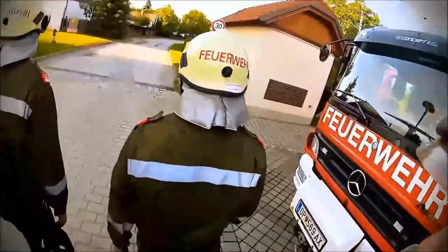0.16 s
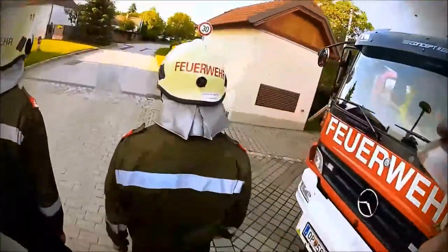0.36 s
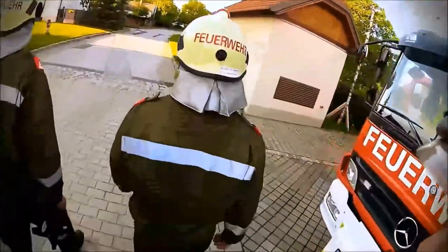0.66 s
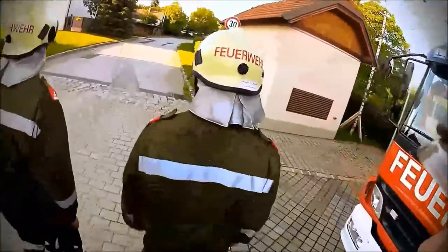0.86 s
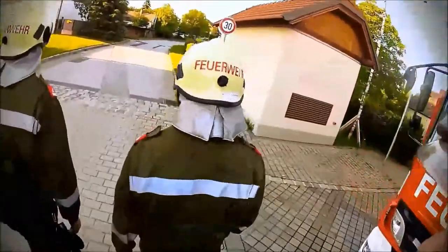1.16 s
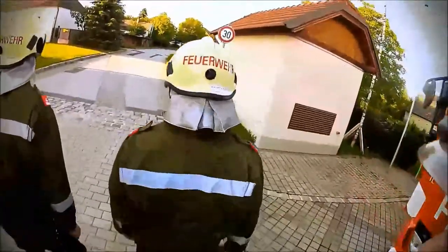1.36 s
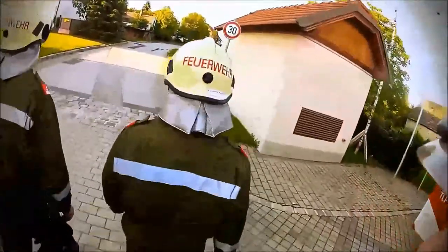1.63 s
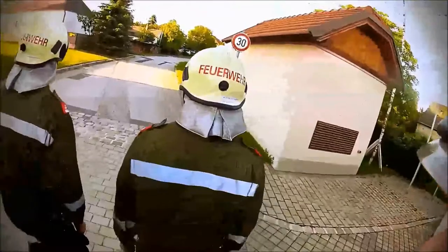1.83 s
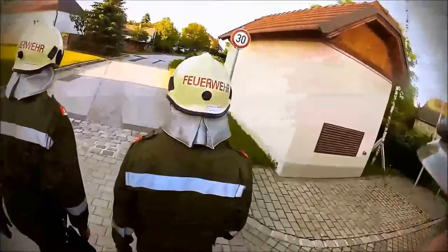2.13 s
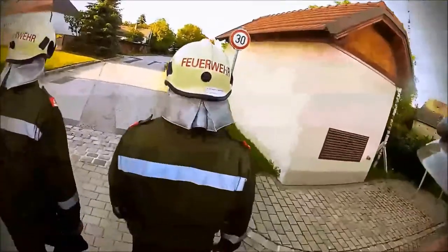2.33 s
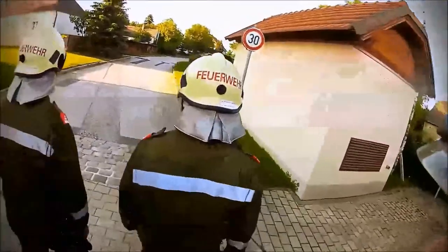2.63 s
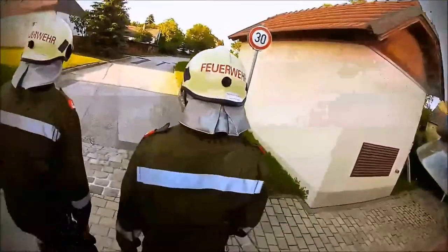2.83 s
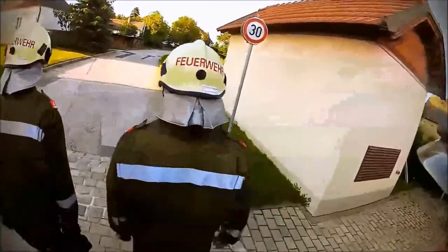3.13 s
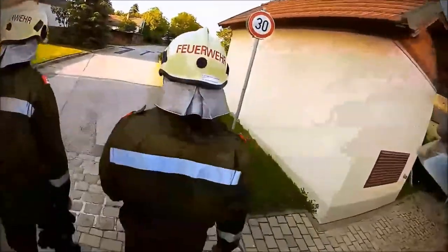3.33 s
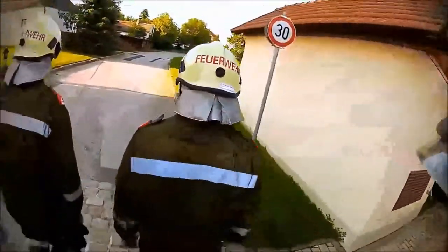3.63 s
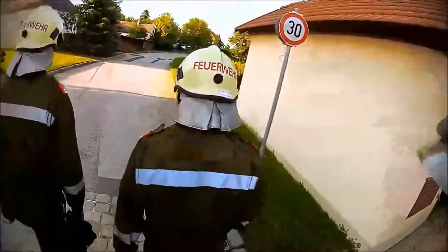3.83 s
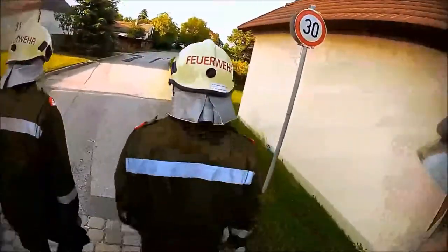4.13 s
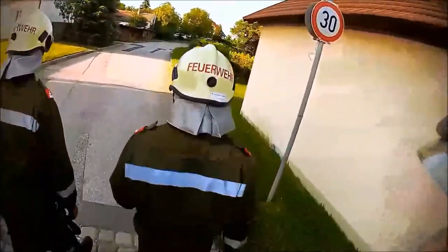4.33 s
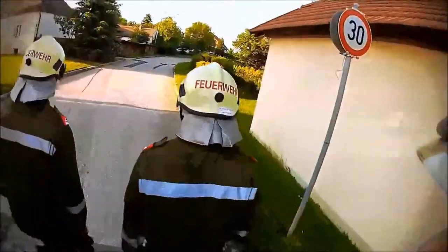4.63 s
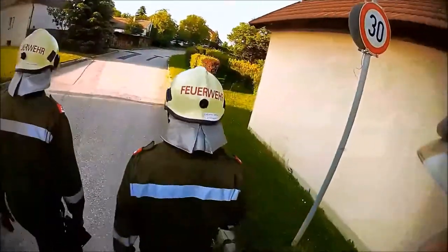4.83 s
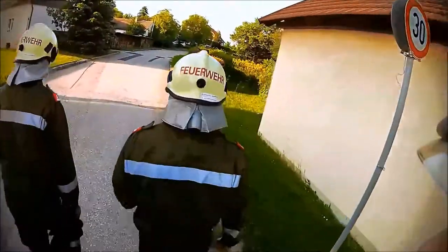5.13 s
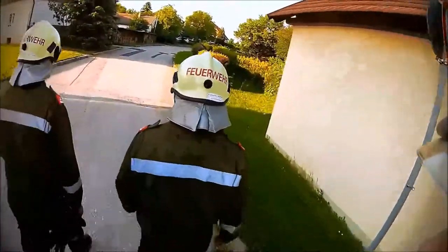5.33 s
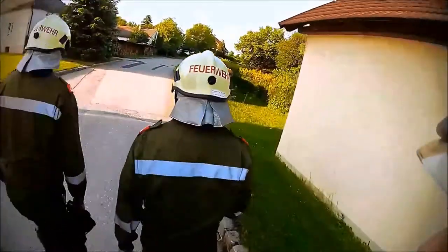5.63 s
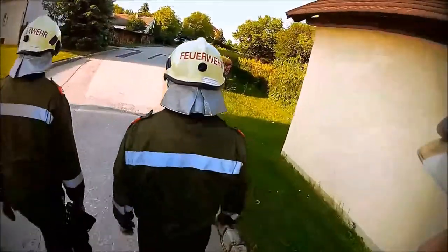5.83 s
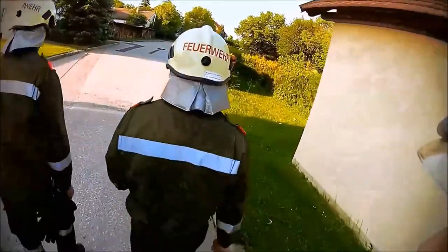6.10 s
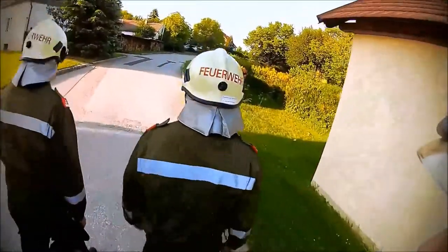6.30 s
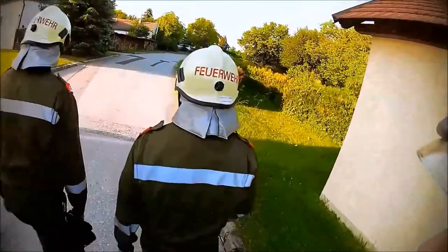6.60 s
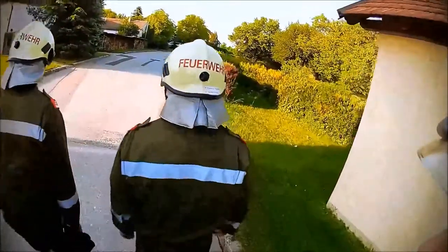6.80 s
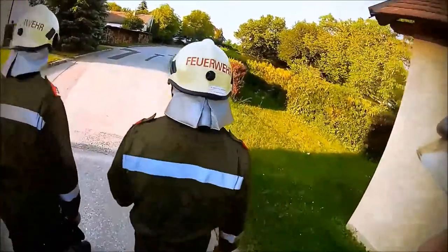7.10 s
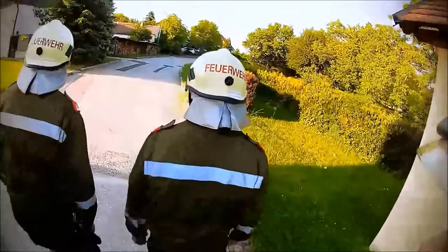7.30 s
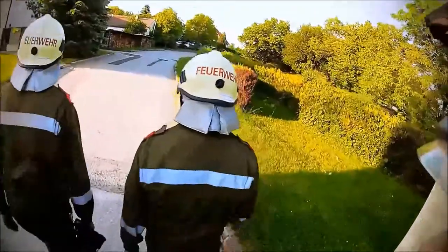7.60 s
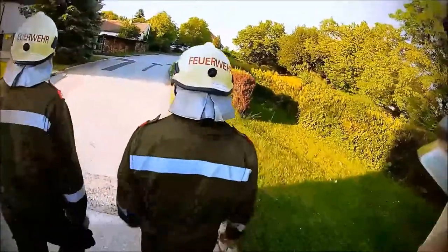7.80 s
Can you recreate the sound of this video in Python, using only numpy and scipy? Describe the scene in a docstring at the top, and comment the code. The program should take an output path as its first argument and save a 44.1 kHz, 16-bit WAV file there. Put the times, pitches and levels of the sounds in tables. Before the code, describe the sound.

Steady marching steps, slightly more than two a second, heard from a microphone strapped to one marcher. Low thuds dominate, varying in force, the second very soft. Short knocks of the loose casing accompany many of them, with lighter ticks on some rebounds. Behind are faint grinding soles, grit taps, rustling jackets, a slight wall reflection and constant thin hiss, with coarse treble.

```python
"""Marching firefighters heard from a body-worn camera

Firefighters march in step over paving and asphalt, one of them wearing a camera.
Each footfall jolts the camera through the body: pulses ring its mount as a low thud.
On many steps and some rebounds the housing clacks, as a burst of decaying modes.
Boots and jackets, shaped noise, are heard faintly through the closed shell, over steady hiss and rumble.
A sample-and-hold recorder mirrors it all into the treble."""
import sys
import numpy as np
from scipy import signal
from scipy.fft import rfft, irfft, next_fast_len
from scipy.io import wavfile
from scipy.ndimage import map_coordinates

SR = 44100
rng = np.random.default_rng(int(sys.argv[2]) if len(sys.argv) > 2 else 0)


def pcm_store(signal):
    """Save signal as 16-bit PCM."""
    levels = np.round(np.clip(np.atleast_2d(signal), -1, 1) * 32767)
    wavfile.write(sys.argv[1], SR, levels.astype(np.int16).T)


N = 350681  # length in samples


def amp(db):
    """Decibels to gain."""
    return 10 ** (np.asarray(db) / 20)


def unit(x):
    """Scale to rms 1."""
    return x / np.sqrt(np.mean(x ** 2) + 1e-20)


def along(points, hz):
    """Read (Hz, value) points on a log frequency axis."""
    point_hz, values = np.transpose(points)
    return np.interp(np.log(hz + 1), np.log(point_hz + 1), values)


def filtered(x, response):
    """Filter x by a complex response of frequency."""
    size = next_fast_len(N + SR)
    spectrum = rfft(x, size) * response(np.fft.rfftfreq(size, 1 / SR))
    return irfft(spectrum, size)[:N]


def noise(spectrum):
    """Coloured noise of rms 1."""
    white = rng.standard_normal(N)
    return unit(filtered(white, lambda hz: amp(along(spectrum, hz))))


def wobble(rate):
    """A smooth random curve, rate knots a second."""
    knots = rng.standard_normal(int(N * rate / SR) + 4)
    return map_coordinates(knots, [np.arange(N) * rate / SR])


def add(track, s, sound):
    """Mix a sound into a track from time s on."""
    start = max(round(s * SR), 0)
    part = track[start:start + len(sound)]
    part += sound[:len(part)]


def resonances(modes, f):
    """Summed response of (Hz, width Hz, gain) resonators."""
    return sum(gain * 1j * f * width / (hz * hz - f * f + 1j * f * width) for hz, width, gain in modes)


# Colour of hiss and outdoor rumble. Each row: frequency in Hz, relative density in dB per Hz.
AIR_SPECTRUM = [(12, -38), (20, -4), (49, -5), (86, -8.5), (197, -10.5), (399, -17), (737, -26), (890, -26),
                (1360, -30), (1810, -29.5), (1980, -30.5), (4980, -34.5), (5600, -35), (7280, -23),
                (12300, -120)]
# Sway and bounce of the camera mount. Each row: frequency in Hz, width in Hz, relative gain (linear).
MOUNT_MODES = [(27.2, 7.4, 7.8), (68, 44, 3), (118, 16, .7), (212, 22, 1.3), (378, 20, 1)]


def air(level_db=-59.5, sway_db=-61):
    """Steady hiss and outdoor rumble, over noise through the lowest mount mode: the carried camera's sway."""
    white = rng.standard_normal(N)
    sway = unit(filtered(white, lambda f: resonances(MOUNT_MODES[:1], f) ** 2))
    return amp(level_db) * noise(AIR_SPECTRUM) + amp(sway_db) * sway


# Colour of rubbing cloth and soles. Each row: frequency in Hz, relative density in dB per Hz.
RUB_SPECTRUM = [(100, 7), (400, -1.5), (800, -4), (1400, -10.5), (2300, -0.5), (4000, 0), (5300, -0.5),
                (6000, 3.5)]


def jackets(level_db=-71, sway_db=3):
    """Heavy cloth keeps up a faint, slowly swaying rustle."""
    return amp(level_db + sway_db * wobble(7.1)) * noise(RUB_SPECTRUM)


# The wearer's footfalls. Each row: main blow in seconds, relative level in dB, duration ratio.
STEPS = [(0.272, -25, 1.01), (0.715, -51, 0.88), (1.146, -26.5, 1), (1.649, -31, 1.09), (2.104, -30, 1.04),
         (2.561, -29, 1.03), (3.008, -27, 1.01), (3.46, -27.5, 1.01), (3.917, -26.5, 0.99),
         (4.362, -31, 1.07), (4.832, -24, 1), (5.292, -27.5, 0.92), (5.748, -24.5, 1.03),
         (6.181, -26, 0.98), (6.64, -29, 1), (7.106, -30, 1.01), (7.576, -31.5, 1.11)]
# The soles start to roll ROLL_LEAD_S before the main blow, then rise, hold and release (s).
ROLL_LEAD_S, ROLL_RISE_S, ROLL_HOLD_S, ROLL_RELEASE_S = 0.067, 0.066, 0.041, 0.055


def rolls(level_db=-55, vary_db=0.5, uneven_db=3.5, grit_db=3):
    """At every step the soles grind from heel to toe, about equally whether the step is hard or light."""
    pressure, t = np.zeros(N), np.arange(SR // 3) / SR
    corners = np.cumsum([0, ROLL_RISE_S, ROLL_HOLD_S, ROLL_RELEASE_S])
    shape = np.interp(t, corners, [0, 1, 1, 0])
    for (s, _, _), size in zip(STEPS, rng.standard_normal(len(STEPS))):
        add(pressure, s - ROLL_LEAD_S, amp(level_db + vary_db * size) * shape)
    roughness_db = uneven_db * wobble(50) + grit_db * wobble(400)
    return pressure * unit(noise(RUB_SPECTRUM) * amp(roughness_db))


# The sharpest taps of soles and grit. Each row: start in seconds, relative level in dB.
TAPS = [(0.222, -65), (0.716, -63), (2.145, -66.5), (2.602, -61.5), (2.95, -65.5), (4.037, -60.5),
        (5.347, -64), (6.147, -66), (6.191, -64)]
# Colour of grit. Each row: frequency in Hz, relative density in dB per Hz.
GRIT_SPECTRUM = [(100, 19.5), (400, -8), (800, 3.5), (1500, 4.5), (2300, 6), (4000, -5.5), (6000, -1.5)]


def taps(level_db=14, t60=0.036, faint_db=-70, vary_db=1.5, lead_s=.02, spread_s=.05, fade_db=2.0, count=5):
    """A toe or bit of grit meets stone: a sudden, quickly dying burst. Faint ones scatter around every step."""
    burst, t = np.zeros(N), np.arange(SR // 10) / SR
    faint = []
    for s, _, _ in STEPS:
        for late, size in zip(rng.exponential(size=count), rng.standard_normal(count)):
            # later ones are weaker
            faint.append((s - lead_s + spread_s * late, faint_db + vary_db * size - fade_db * late))
    for s, db in list(TAPS) + faint:
        add(burst, s, amp(db + level_db - 60 * t / t60))
    return burst * noise(GRIT_SPECTRUM)


# Soles that drag and stand out. Each row: centre in seconds, relative level in dB,
# half length (Gaussian sigma) in seconds, hiss relative to the dull part in dB.
SCUFFS = [(0.256, -56, 0.0065, 5), (0.628, -63, 0.0091, -10), (0.764, -59, 0.012, 10),
          (0.804, -58, 0.008, -20), (1.208, -60, 0.0085, 6.5), (1.579, -66.5, 0.016, -5),
          (2.982, -63, 0.029, -3), (3.089, -63.5, 0.018, 0.5), (3.879, -61, 0.011, 4),
          (4.012, -59.5, 0.0086, -1), (4.385, -53.5, 0.0064, -6), (4.796, -55.5, 0.007, -9),
          (4.831, -57.5, 0.015, 3), (5.236, -66.5, 0.02, -2), (5.321, -65, 0.013, 1.5),
          (5.929, -65, 0.018, -7), (6.688, -62.5, 0.0061, 6), (6.77, -59.5, 0.015, 5)]


def scuffs(level_db=14, grit_db=4.0, hiss_hz=4000):
    """A dragged sole makes a short stroke of gritty friction; some hiss more sharply than others."""
    stroke, hiss = np.zeros((2, N))
    for s, db, half, hiss_db in SCUFFS:
        t = np.arange(round(6 * half * SR)) / SR - 3 * half
        swell = amp(db + level_db) * np.exp(-.5 * (t / half) ** 2)
        add(stroke, s + t[0], swell)
        add(hiss, s + t[0], swell * amp(hiss_db))
    grit = unit(noise(RUB_SPECTRUM) * amp(grit_db * wobble(400)))
    dull = filtered(grit, lambda hz: 1 / (1 + (hz / hiss_hz) ** 6))
    return stroke * dull + hiss * (grit - dull)


# Colour of soles slapping the ground. Each row: frequency in Hz, relative density in dB per Hz.
SLAP_SPECTRUM = [(60, 4), (200, 24), (400, 3.5), (700, 3.5), (1500, 3.5), (2300, -8), (4000, -30),
                 (6000, -13)]


def boots(level_db=-53, lead_s=.028, spread_s=.035, t60=0.12, crunch_db=4, follow=1.0, count=10):
    """The group's soles slap the ground nearly together, harder when the wearer stamps."""
    power, t = np.zeros(N), np.arange(SR // 5) / SR
    usual_db = np.median(np.array(STEPS)[:, 1])
    for s, db, _ in STEPS:
        force_db = level_db + follow * (db - usual_db)
        for late, size in zip(rng.exponential(size=count), rng.standard_normal(count)):
            slap = amp(force_db + 2 * size - 2 * late - 60 * t / t60)
            add(power, s - lead_s + spread_s * late, slap ** 2)
    return np.sqrt(power) * unit(noise(SLAP_SPECTRUM) * amp(crunch_db * wobble(300)))


# Decay of the house front's answer. Each row: frequency in Hz, t60 in seconds.
WALL_DECAY = [(200, 0.74), (2000, 1), (10000, 0.16)]


def wall(x):
    """A short diffuse answer from the house front: decaying noise, delayed by 12.5 ms."""
    hz, t, z = signal.stft(rng.standard_normal(SR // 2), SR, nperseg=256)
    decay = amp(-60 * t / along(WALL_DECAY, hz)[:, None])
    tail = signal.istft(z * decay, SR, nperseg=256)[1]
    delayed = np.pad(x, (SR // 80, 0))
    return signal.fftconvolve(delayed, tail / np.linalg.norm(tail))[:N]


# Resonances that let outside sound in. Each row: frequency in Hz, width in Hz, gain in dB.
SHELL_MODES = [(385.4, 68, 10), (682, 266, 4.5), (850, 130, -9.5), (1064, 100, -2), (1470, 170, 0),
               (2160, 288, 5), (3190, 350, -1.5), (3823, 52, 2), (4800, 1100, -14)]


def through_shell(outside):
    """The closed housing passes airborne sound mainly at its resonances."""
    modes = [(hz, width, amp(db)) for hz, width, db in SHELL_MODES]
    return filtered(outside, lambda f: resonances(modes, f))


def ring(modes, t, spread_db, detune):
    """One decaying sine a mode, a little different in strength and pitch at every blow."""
    hz, db, t60 = np.transpose(modes)[:, :, None]
    size, shift = rng.standard_normal((2, *hz.shape))
    envelope = amp(db + spread_db * size - 60 * t / t60)
    return envelope * np.sin(2 * np.pi * hz * (1 + detune * shift) * t)


# The housing hits its stop, at a hard heel strike or lightly on the rebound.
# Each row: contact in seconds, relative level in dB.
CLACKS = [(0.249, -37), (1.123, -37), (2.083, -39), (2.986, -38), (3.177, -47.5), (3.441, -40.5),
          (3.896, -39.5), (4.809, -36), (5.01, -47.5), (5.272, -40), (5.723, -39), (5.907, -47.5),
          (6.622, -40.5), (6.812, -46.5), (7.555, -39)]
# Modes of the housing. Each row: nominal frequency in Hz, relative level in dB, t60 in seconds.
HOUSING_MODES = [(210, -8, .04), (375.3, -2, 0.18), (782, 5.5, 0.058), (876, 3.5, 0.037),
                 (1087, 11.5, 0.0091), (1440, -9, 0.0061), (1540, -2, 0.01), (1853, 12, 0.022),
                 (2250, 7.5, 0.017), (2560, 0.5, 0.0066), (2860, 0.5, 0.018), (3470, -2, 0.0097),
                 (4860, -29, 0.0037)]
# A clack below FULL_CLACK_DB loses treble: dB per octave for each dB it is weaker.
FULL_CLACK_DB, CLACK_DULLING = -38, 1.74


def clacks(level_db=-6, bounce_s=0.00448, bounce_db=-7, soft_hz=1100, attack_s=0.0001,
           slide_db=-17, slide_s=0.0081):
    """The housing slides into its stop and the contact wakes its modes; a duller bounce follows at once."""
    track, slide = np.zeros((2, N))
    t = np.arange(SR // 12) / SR
    hz = np.array(HOUSING_MODES)[:, :1]
    sign = (-1) ** np.arange(len(hz))[:, None]  # neighbouring modes start in opposite directions
    octaves = np.clip(np.log2(hz / 900), 0, 1.3)
    for s, db in CLACKS:
        bright_db = CLACK_DULLING * min(db - FULL_CLACK_DB, 0)
        modes = sign * ring(HOUSING_MODES, t, spread_db=2.0, detune=0.02) * amp(bright_db * octaves)
        crack = amp(bright_db - 14 - 60 * t / 0.038) * rng.standard_normal(len(t))
        contact = (modes.sum(0) + crack) * (1 - np.exp(-t / attack_s))
        bounce = (modes / (1 + (hz / soft_hz) ** 4)).sum(0)
        add(track, s, amp(db + level_db) * contact)
        add(track, s + bounce_s, amp(db + level_db + bounce_db) * bounce)
        # the slide swells up to the moment of contact
        add(slide, s - t[-1], amp(db + slide_db) * np.exp(-t[::-1] / slide_s))
    return track + slide * noise(GRIT_SPECTRUM)


# Jolts within a footfall, from heel strike to settling.
# Each row: nominal delay from the main blow in seconds, signed relative push, nominal contact time in seconds.
JOLTS = [(-.022, .58, .0037), (-.008, .35, .007), (0, -.95, .0035), (.021, .24, .006), (.054, .09, .008)]
# A lighter step lands more softly: contact time ratio at FIRM_DB, its growth in dB per dB of lost force.
FIRM_DB, FIRM_SOFTNESS, SOFTENING = -25, 0.93, 0.29


def thuds(vary=0.16, scatter=0.032, heel_ratio=0.85):
    """Each jolt is a smooth push with recoil, longer on a light step; the mount rings on after it."""
    track = np.zeros(N)
    lead = .1  # seconds of room before the main blow
    t = np.arange(SR // 3) / SR - lead
    for s, db, duration in STEPS:
        softness = FIRM_SOFTNESS * amp(SOFTENING * (FIRM_DB - db))
        draws = rng.standard_normal((len(JOLTS), 2))
        for k, ((delay, push, contact), (late, size)) in enumerate(zip(JOLTS, draws)):
            width = contact * softness * (heel_ratio if k == 0 else 1)
            # only jolts after the main blow scatter in time
            moment = delay * duration + max(delay, 0) * scatter * late
            u = (t - moment) / width
            pulse = (1 - 3 * u ** 2) / (1 + u ** 2) ** 3
            add(track, s - lead, amp(db) * push * (1 + vary * size) * pulse)
    return filtered(track, lambda f: 1 + resonances(MOUNT_MODES, f))


# Colour of shaking jacket and straps. Each row: frequency in Hz, relative density in dB per Hz.
STRAPS_SPECTRUM = [(20, -18), (60, 9.5), (130, 1.5), (250, -7), (340, -23), (500, -43), (1200, -70)]


def shudder(level_db=-17, rise_s=0.017, t60=0.55):
    """Jacket and straps shake loosely after each footfall, giving the thud a ragged tail."""
    shake, t = np.zeros(N), np.arange(SR // 2) / SR
    heel_s = JOLTS[0][0]
    for s, db, _ in STEPS:
        add(shake, s + heel_s, amp(db + level_db - 60 * t / t60) * (1 - np.exp(-t / rise_s)))
    return shake * noise(STRAPS_SPECTRUM)


def scene():
    """Body-borne thuds and clacks, with the airborne steps around them."""
    outside = jackets() + rolls() + taps() + scuffs() + boots()
    outside = outside + amp(-15.5) * wall(outside)
    return (air() + through_shell(outside) + clacks() + thuds() + shudder())[None]


EDGE_HZ = 5646  # the recorder's input filter
HOLD_HZ = 12000  # its sampling rate
TOP_HZ = 15650  # nothing passes above this


def record(dry):
    """Band-limited sampling at a low rate; holding each sample mirrors the sound around that rate."""
    band = filtered(dry[0], lambda hz: 1 / (1 + (hz / EDGE_HZ) ** 36) * (hz < HOLD_HZ / 2))
    # the cosine makes the mirror images, the sinc is the response of the hold
    sampled = band * (1 + 2 * np.cos(2 * np.pi * HOLD_HZ * np.arange(N) / SR))
    return filtered(sampled, lambda hz: np.sinc(hz / HOLD_HZ) * (hz < TOP_HZ))[None]


dry = scene()
out = record(dry)
pcm_store(out)
```